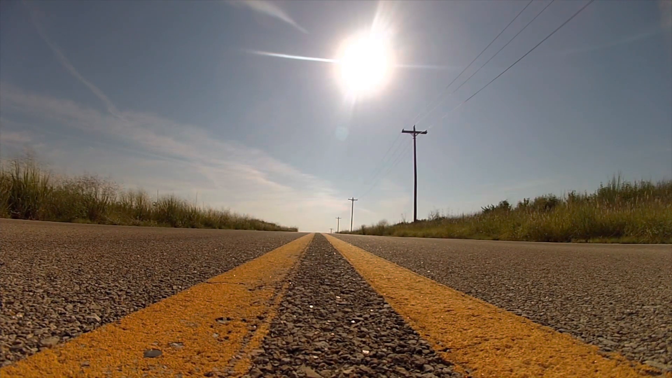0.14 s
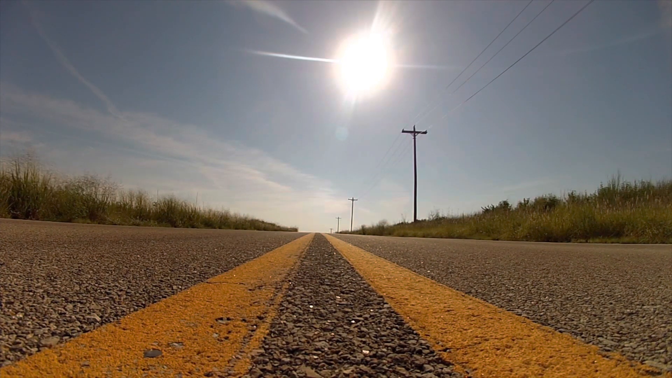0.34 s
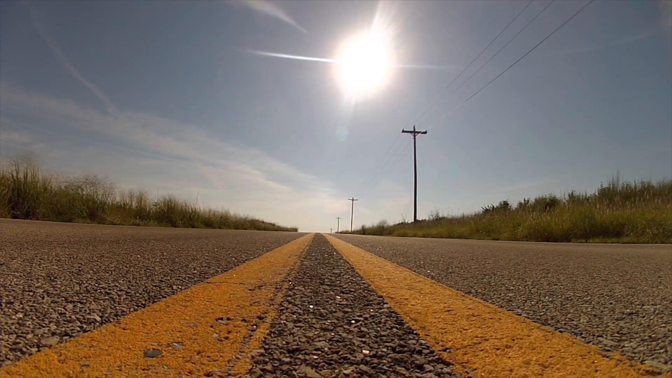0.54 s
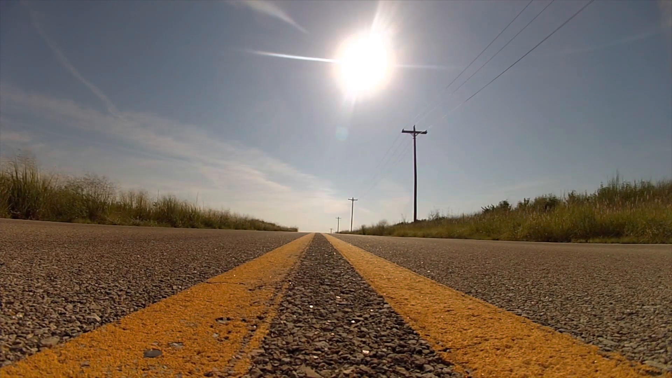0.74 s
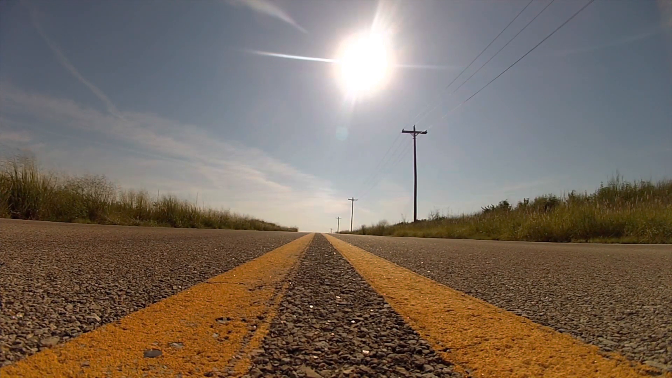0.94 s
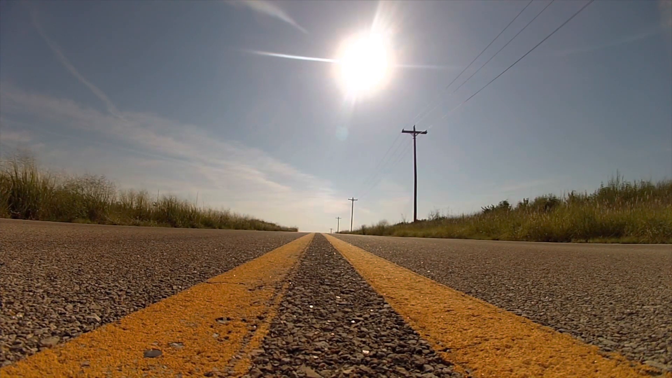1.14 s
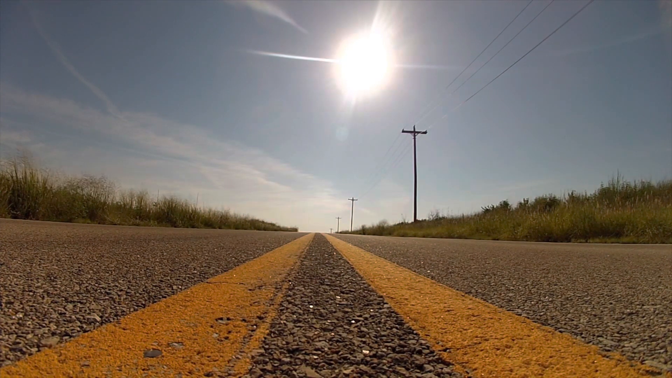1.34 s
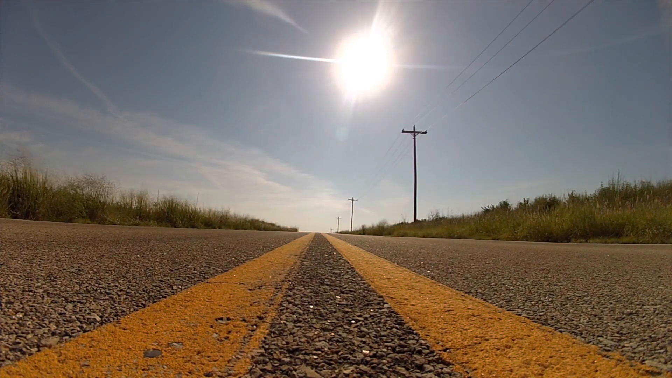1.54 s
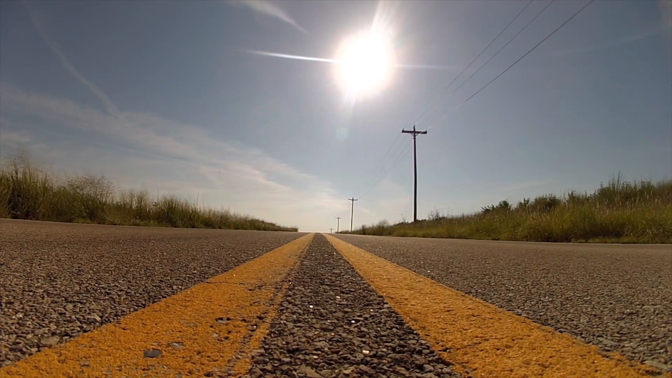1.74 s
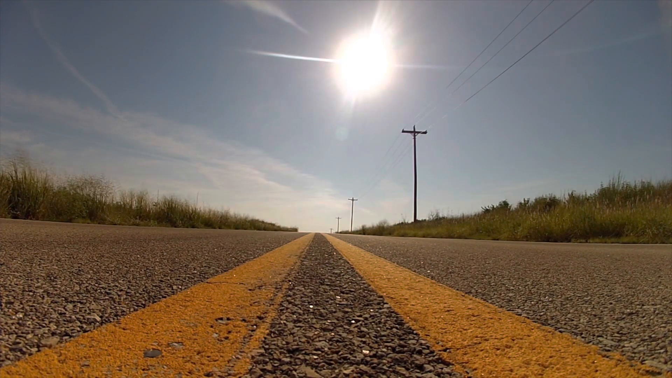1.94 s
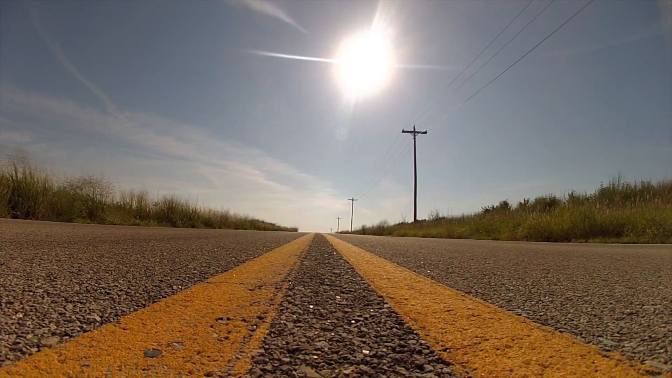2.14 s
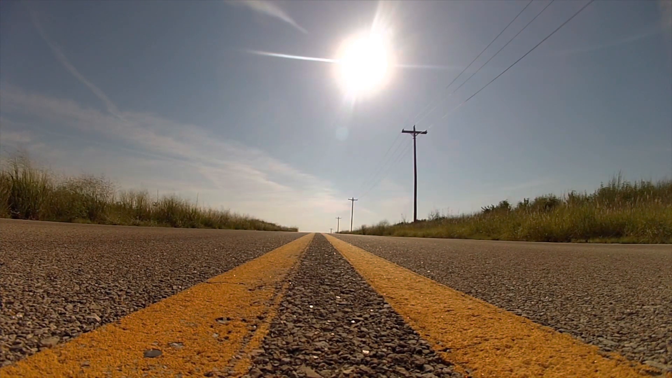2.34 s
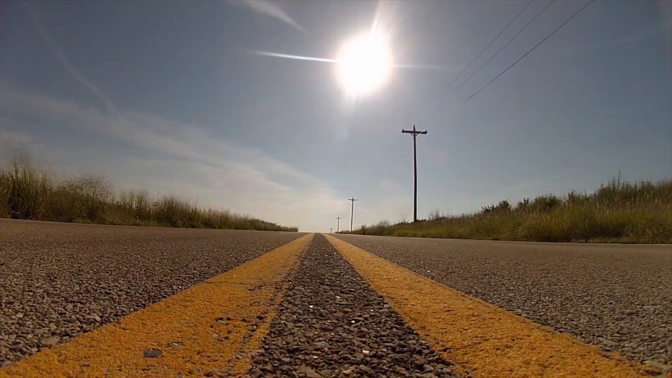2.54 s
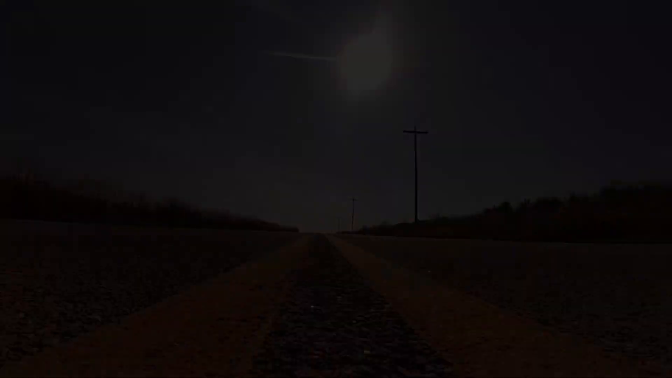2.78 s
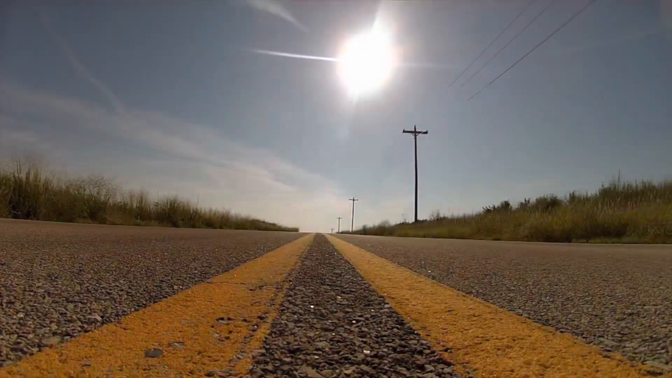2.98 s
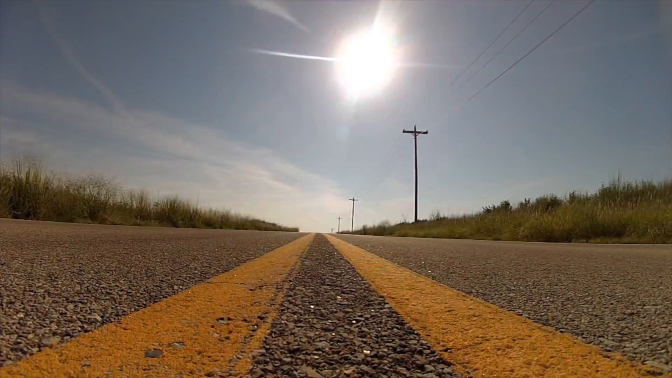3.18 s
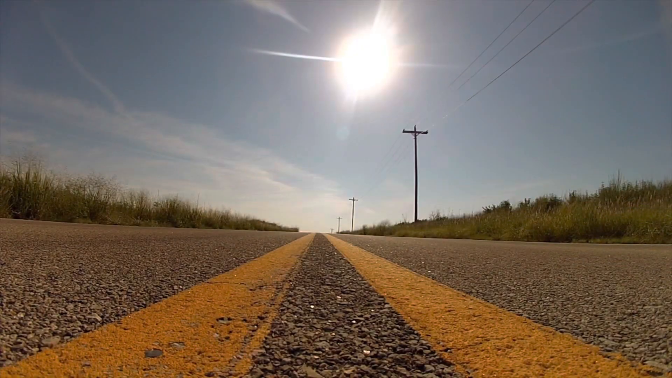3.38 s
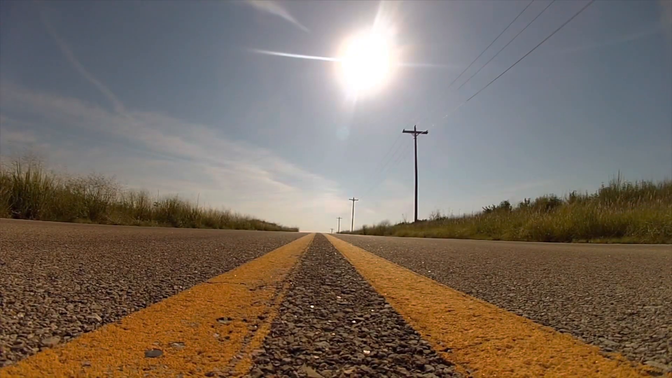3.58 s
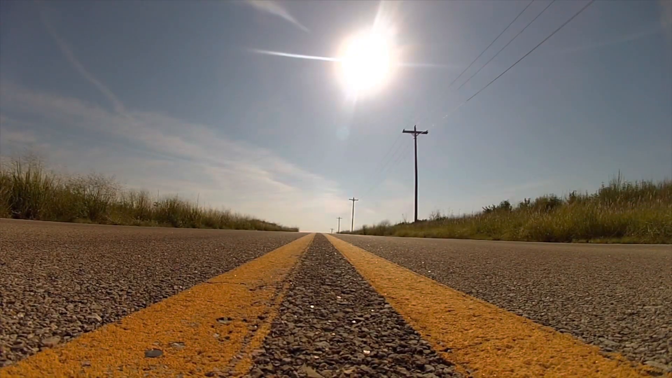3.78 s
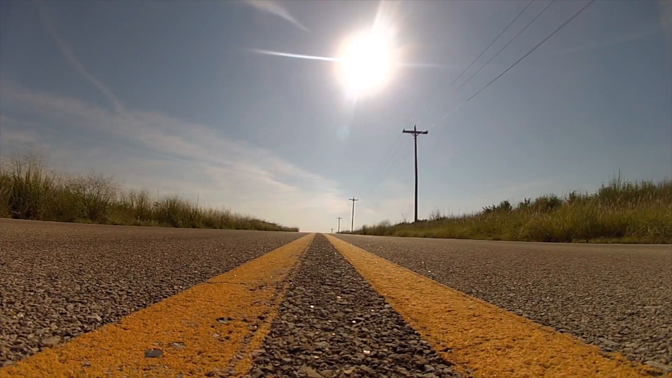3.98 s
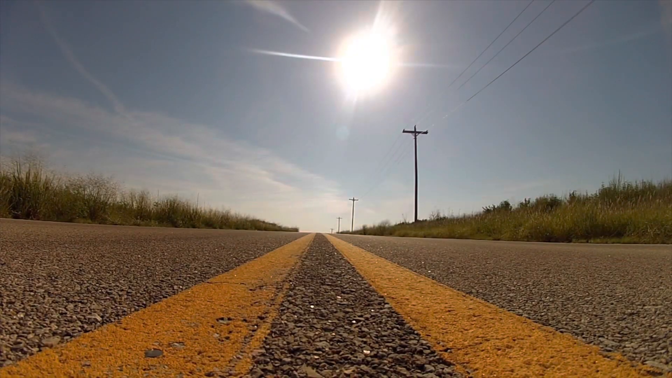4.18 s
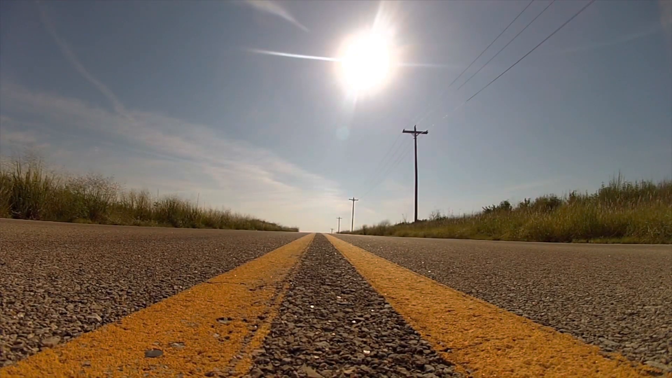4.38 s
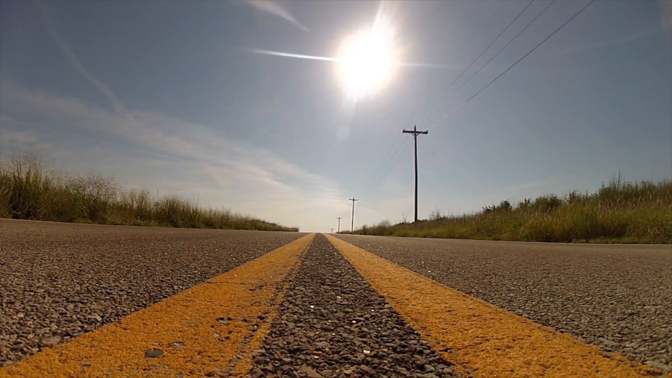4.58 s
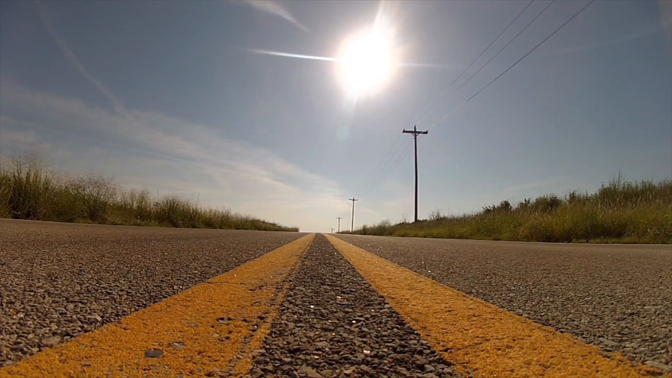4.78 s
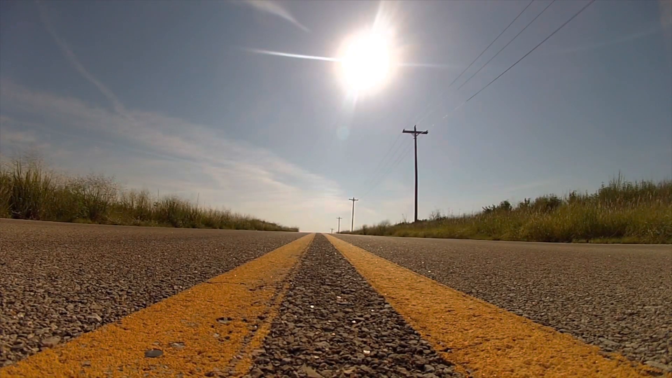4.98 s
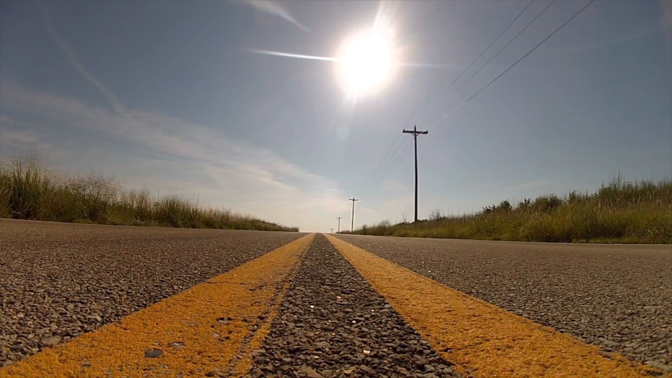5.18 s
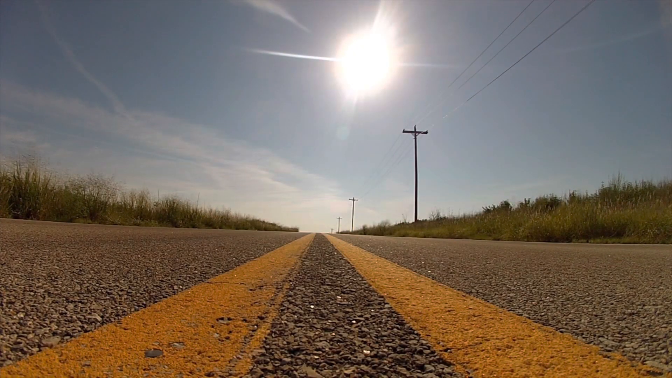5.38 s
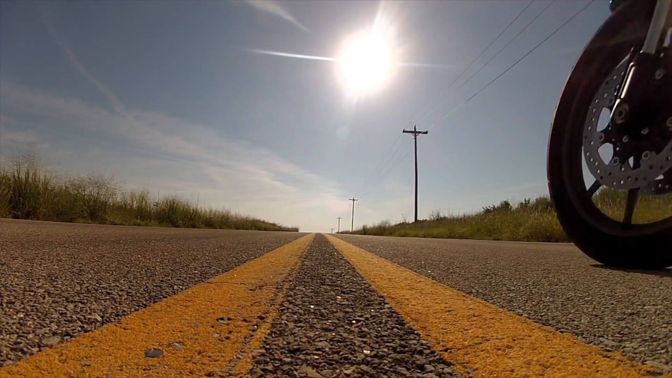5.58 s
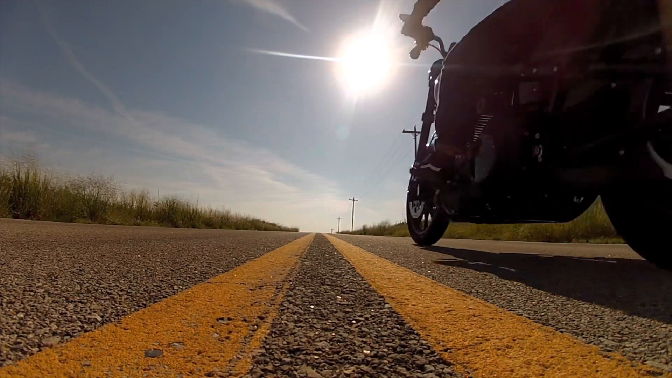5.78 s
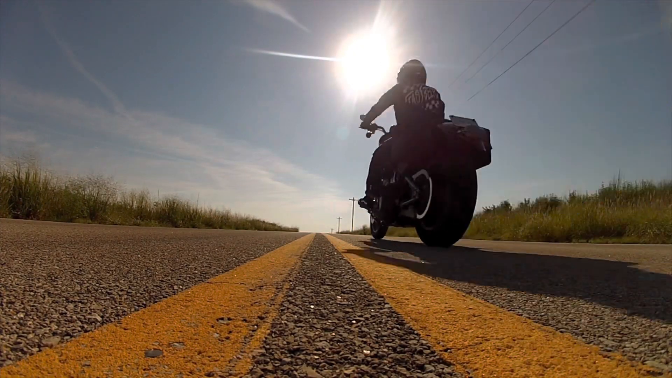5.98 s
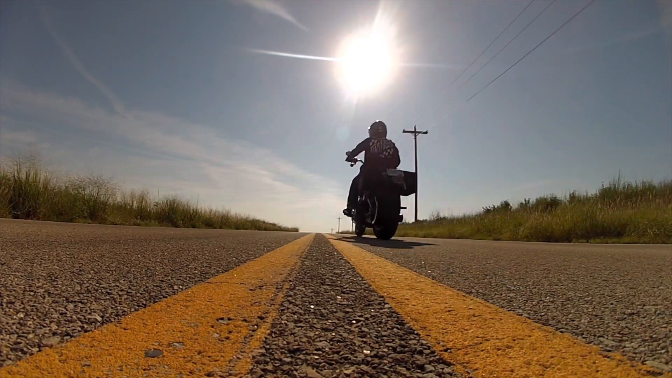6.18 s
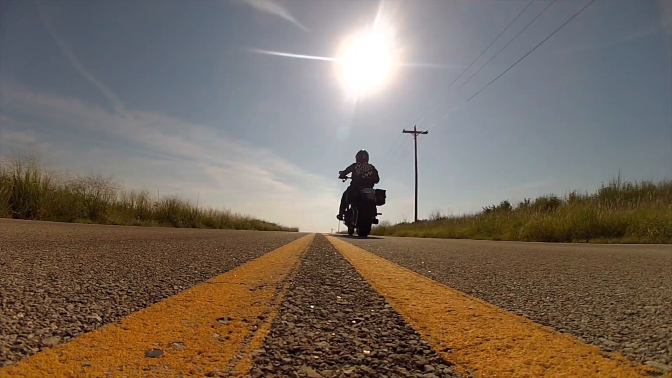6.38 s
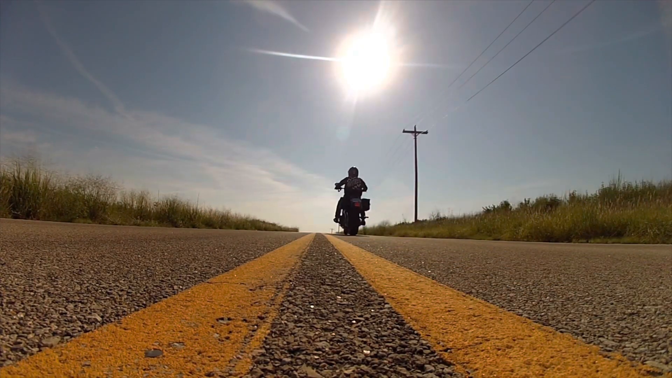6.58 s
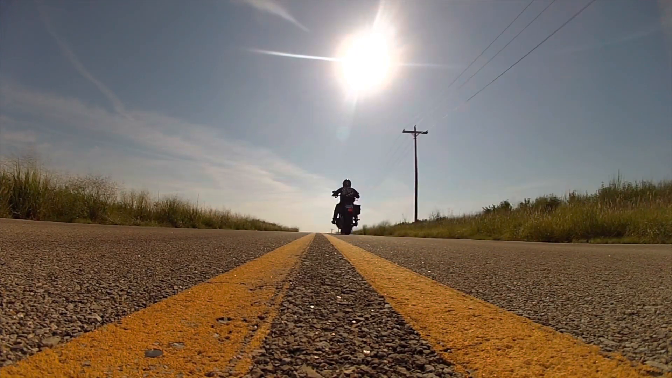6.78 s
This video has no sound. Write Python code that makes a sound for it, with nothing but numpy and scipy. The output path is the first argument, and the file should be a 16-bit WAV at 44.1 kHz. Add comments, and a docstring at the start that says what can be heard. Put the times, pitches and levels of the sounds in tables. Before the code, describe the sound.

A big twin-cylinder motorcycle drones off into the distance, then rolls up from behind, drops to idle, passes close and barks away under throttle blips.

```python
"""A big V-twin motorcycle with open pipes, heard by a microphone lying on a country road.
First it drones away into the distance: sharp exhaust pulses with noisy treble that dies off. After a short fade
it rolls up from behind and drops to idle: tones locked to the crank boom, under clatter and gear whine.
It passes and barks off under blips of throttle: single thumps with jet noise, and a soft throb and burble.
Quiet air noise lies beneath it all, and the loudest barks overload the microphone."""
import sys
import numpy as np
from scipy import signal
from scipy.fft import rfft, irfft, next_fast_len
from scipy.io import wavfile
from scipy.ndimage import uniform_filter1d, map_coordinates

SR = 44100
rng = np.random.default_rng(int(sys.argv[2]) if len(sys.argv) > 2 else 0)


def file_out(sig):
    """Save sig as 16-bit WAV at sys.argv[1]."""
    # one column per channel
    cols = np.atleast_2d(sig).T
    # limit, then scale
    lim = np.clip(cols, -1, 1)
    pcm = np.round(lim * 32767).astype(np.int16)
    wavfile.write(sys.argv[1], SR, pcm)


N = 301203
T = np.arange(N) / SR  # time in s
CUT_S, PASS_S = 2.776, 5.72  # the ride away ends and the approach begins; the engine passes
CRUISE_HZ, IDLE_HZ = 21.7, 9.5  # engine cycles a second

# Colour tables, here and below, give relative levels per Hz over frequency.
# Low rumble of the engine and pipes: (f/Hz, level/dB)
RUMBLE_COLOUR = [(12, -50), (20, -4), (38, -19.5), (75, -7.5), (97, 2), (117, -5.5), (135, -17.5),
                 (177, 5.5), (225, -25.5), (290, -9), (468, -14), (818, -23.5), (900, -30.5), (1170, -42.5),
                 (1980, -120)]
# The snap of a firing: (f/Hz, level/dB)
SNAP_COLOUR = [(210, -8.5), (350, -10), (635, -18.5), (906, -14), (1220, -22), (1680, -23), (2400, -38.5),
               (3120, -65.5), (5280, -120)]
# Clattering engine parts: (f/Hz, level/dB)
CLATTER_COLOUR = [(710, -5), (1200, -8.5), (1460, -14.5), (1690, -6.5), (2110, -11.5), (2370, -19),
                  (2870, -7), (3310, -12), (4340, -10.5), (5290, -14.5), (6880, -28), (8000, -25),
                  (10400, -59.5), (17600, -120)]
# What the engine is doing: (t/s, state: 0 cruising, 1 throttle shut, 2 idling)
ENGINE_STATE = [(3.785, 0), (3.803, 1), (4.3, 1), (4.55, 2)]


def leaving():
    """A slowing engine fires unevenly; the roadside scatters the treble of its pulses into a later rasp."""
    # Fading exhaust: (t/s, level/dB)
    exhaust_levels = [(0.0, -23.5), (0.8, -25.5), (1.76, -30), (2.7, -32.5)]
    speed_hz = 26.745 - 1.1244 * T  # engine cycles a second
    crank = np.cumsum(speed_hz) / SR - .645
    exhaust_db, = curves(exhaust_levels)
    train = firings(crank, gap=.408, second_db=-4.5, scatter_db=.6, jitter_s=.00004)
    far = np.clip(T / CUT_S, 0, 1)
    exhaust = far_exhaust(crank, train, far)
    treble = far_treble(crank, train, far, exhaust_db)
    fade = np.clip((CUT_S - T) / 0.04, 0, 1)
    return fade * (amp(exhaust_db) * exhaust + treble)


def far_exhaust(crank, train, far):
    """Each firing sends a pressure pulse with a bite; its colour changes with distance (far, 0 to 1)."""
    # Pulses from behind the pipes: (f/Hz, level/dB)
    near_pipe = [(15, -57), (30, -17), (60, 5.5), (125, 9), (200, 3), (320, 7), (400, 7), (480, 3),
                 (620, -5), (800, -30), (1050, 0), (1400, -65), (1850, -43), (2400, -54), (2900, -48),
                 (4500, -69), (8000, -110)]
    # The same pulses from further off: (f/Hz, level/dB)
    far_pipe = [(15, -53), (30, -2.5), (60, 11.5), (125, 5), (180, 10.5), (240, 3.5), (320, -0.5),
                (460, -6), (620, 0), (800, -30), (1050, -2), (1400, -68), (1850, -38), (2400, -54),
                (2900, -42), (4500, -62), (8000, -110)]
    # The bite of a far firing: (f/Hz, level/dB)
    bite_colour = [(250, -68), (450, 14.5), (600, 14.5), (750, 13.5), (950, 3.5), (1200, -22.5), (1500, -6),
                   (2000, -21), (2900, -12.5), (4000, -82), (8000, -100)]
    # Firings that bite harder: (t/s, extra level/dB)
    hard_bites = [(.401, 2.5), (.4395, 2.5), (.478, 1), (.5925, 5.5), (.631, 3), (.747, 4), (.786, 4.5),
                  (.98, 2), (1.097, 6.5), (1.215, 2.5), (1.2545, 7), (1.532, 5), (1.773, 4.5), (2.14, 1.5),
                  (2.264, 0), (2.3885, 5), (2.555, 4.5)]
    # Rough road noise under the pulses: (f/Hz, level/dB)
    road_colour = [(15, -57), (25, -17.5), (92, -18), (146, 2), (185, -36), (397, 21), (920, -7),
                   (1490, -39), (1750, -35), (2410, -15), (3000, -5), (3900, -73), (6600, -120)]
    near_pulses = unit(coloured(train, near_pipe, ring=0.19, lean=-0.75))
    far_pulses = unit(coloured(train, far_pipe, ring=0.19, lean=-0.75))
    pulses = (1 - far) * near_pulses + far * far_pulses
    # Each firing bites with its own strength.
    bite = firings(crank - .008, gap=.408, second_db=-15, scatter_db=1.3, jitter_s=.00006)
    bite = bite * amp(sum(db * bump(s, .006) for s, db in hard_bites))
    bite = unit(coloured(bite, bite_colour, ring=0.23, lean=0.77))
    road = amp(-21) * noise(road_colour)
    return pulses + amp(-6.5 + 0.78 * far) * bite + road


def far_treble(crank, train, far, exhaust_db):
    """Bursts of noise follow the firings as rasp, sizzle, ticks, pipe ring and spit, and fade with distance."""
    # Rows rasp, sizzle, tick, ring, spit: (level at the start/dB, dB lost per dB of exhaust)
    treble_fades = [(-34.5, 1.15), (-55.5, 1.2), (-55.5, 5), (-38, 0.6), (-37.5, 2.5)]
    # Rasp: (f/Hz, level/dB)
    rasp_colour = [(400, -9), (700, 2), (900, -1.5), (1050, -6), (1200, -3.5), (1450, -13), (1700, -6),
                   (1850, -3.5), (2050, -13.5), (2400, -21), (3250, -31.5), (5500, -110)]
    # A band of rasp that dies first: (f/Hz, level/dB)
    early_colour = [(1100, -34), (1300, -3), (1500, 2), (1800, 2), (1950, -15), (2300, -56.5)]
    # Sizzle: (f/Hz, level/dB)
    sizzle_colour = [(2000, -37), (2500, 2.5), (2900, -11.5), (3500, -6), (4500, -8.5), (6000, -26.5),
                     (9000, -50)]
    # Valve ticks: (f/Hz, level/dB)
    tick_colour = [(3500, -18), (4500, -11), (5300, 19), (5900, -21), (6500, -33), (9000, -58)]
    # The tail pipe ringing on after a firing: (f/Hz, level/dB)
    ring_colour = [(600, -28), (850, -2.5), (1000, 4), (1120, -5), (1300, -23.5), (2000, -62.5)]
    # A short rasp between firings: (f/Hz, level/dB)
    spit_colour = [(450, -19), (750, -3.5), (1050, 0.5), (1350, -5), (1750, 3.5), (2000, -1.5), (2300, -17),
                   (2800, -14), (3200, -23), (5500, -51.5)]
    exhaust_change_db = exhaust_db - exhaust_db[0]
    rasp_db, sizzle_db, tick_db, ring_db, spit_db = [
        start_db + loss * exhaust_change_db for start_db, loss in treble_fades]
    # The rasp swells once, and the other layers take a share.
    swell_db = 7.5 * bump(1, 0.17)
    rasp_db, sizzle_db = rasp_db + 1.25 * swell_db, sizzle_db + 0.18 * swell_db
    ring_db, spit_db = ring_db + 0.57 * swell_db, spit_db + 0.96 * swell_db

    late = firings(crank - .63, gap=.05, second_db=-3, scatter_db=2.5, jitter_s=.0007)
    jet_train = 0.55 * np.roll(train, -40) + 0.28 * (1 - far) * late
    jets = unit(puffs(jet_train, rise_s=0.0029, fall_s=0.0024))
    rasp = unit((0.83 * amp(-0.6 * swell_db) + jets) * noise(rasp_colour))
    early = amp(-40.5) * bump(0, 0.25) * unit((1.8 + jets) * noise(early_colour))
    sizzle = unit((0.66 + jets) * amp(2.3 * wobble(25.66)) * noise(sizzle_colour))
    valves = firings(crank - .62, gap=0.31, second_db=-15, scatter_db=5.0, jitter_s=0.0014)
    taps = unit(puffs(valves, rise_s=0.0011, fall_s=0.0046))
    tick = unit((0.27 + taps) * noise(tick_colour))
    knocks = firings(crank - .02, gap=.43, second_db=-1, scatter_db=3.5, jitter_s=.0004)
    ring = unit(puffs(knocks, rise_s=0.0012, fall_s=0.0032) * noise(ring_colour))
    spit = unit(puffs(late, rise_s=0.0012, fall_s=0.0024) * noise(spit_colour))
    return (amp(rasp_db) * rasp + early + amp(sizzle_db) * sizzle + amp(tick_db) * tick
            + amp(ring_db) * ring + amp(spit_db) * spit)


def arriving():
    """Each firing booms in the pipes; the engine's clatter and gears rise as it comes close."""
    # Engine speed: (t/s, cycles a second/Hz)
    speeds = [(2.77, 21.8), (2.9, 21.2), (3.05, 21.22), (3.2, 22.0), (3.33, 21.45), (3.76, 22.22),
              (3.81, 20.75), (3.9, 20.07), (4.35, 12.97), (4.4, 12.4), (4.5, 11.95), (4.56, 11.3),
              (4.65, 10.15), (4.75, 9.61), (5.05, 9.54), (5.24, 9.33), (5.62, 8.97)]
    # Layer levels on the way in: (t/s, boom level/dB, snap level/dB, clatter level/dB)
    layer_levels = [(2.86, -17.5, -40, -52), (3.3, -15, -37, -45.5), (3.78, -15, -34, -40.5),
                    (3.81, -14.5, -29.5, -41), (4.59, -17, -41.5, -39.5), (4.96, -14.5, -34.5, -38.5),
                    (5.6, -14, -31, -36.5), (5.68, -15.5, -31.5, -42.5)]
    # Hiss: (f/Hz, level/dB)
    hiss_colour = [(3530, -17), (6000, -2), (6650, -5), (9020, 2.5), (13200, -4), (14200, -43),
                   (15400, -14.5)]
    # Uneven burning: (f/Hz, level/dB)
    burble_colour = [(120, -35), (220, -5), (300, -2), (450, -9.5), (680, -10), (900, -34.5), (1500, -61)]
    speed_hz, = curves(speeds)
    crank = np.cumsum(speed_hz * (T > CUT_S)) / SR + 1e-9 * T - .32  # the tiny slope keeps it rising
    boom_db, snap_db, clatter_db = curves(layer_levels)
    state, = curves(ENGINE_STATE)

    train = firings(crank + 0.033, gap=.43, second_db=-4.5, scatter_db=3, jitter_s=0.00083)
    jet = puffs(train, rise_s=0.00074, fall_s=0.0057)
    jet /= uniform_filter1d(jet, SR // 4) + 1e-9  # even strength at any engine speed
    rumble = amp(-31 + 4 * state) * noise(RUMBLE_COLOUR)
    popping = np.clip(1 - np.abs(state - 1), .2, 1)  # firings pop most with the throttle shut
    snap = (1 - .55 * popping + .55 * popping * jet) * noise(SNAP_COLOUR)
    clatter = (0.92 + 0.086 * jet) * amp(0.86 * wobble(45)) * noise(CLATTER_COLOUR)
    # Hiss grows faster than the clatter and flares as the engine draws level.
    hiss_db = -58 + 1.6 * (clatter_db - clatter_db.max()) + 10.5 * bump(5.45, 0.1)
    hiss = amp(1.7 * wobble(40)) * noise(hiss_colour)
    slow = (CRUISE_HZ - speed_hz) / (CRUISE_HZ - IDLE_HZ)  # 0 at cruising speed, 1 at idle
    burble_db = -40 + 3 * slow + 2.5 * wobble(35) - 4 * (state == 0)
    burble = amp(burble_db) * noise(burble_colour)
    fade = np.clip((T - CUT_S) / 0.012, 0, 1) ** 2 * np.clip((PASS_S - T) / 0.014, 0, 1)
    return fade * (amp(boom_db) * (boom(crank, speed_hz, state) + rumble) + amp(snap_db) * snap
                   + amp(clatter_db) * clatter + amp(hiss_db) * hiss + gear_whine(crank)
                   + loose_rattle() + burble)


def boom(crank, speed_hz, state):
    """Tones of the cycle: pressure jumps at both firings when shut, and is spread out when cruising or idling."""
    # Tone strengths: (multiple of the cycle, cruising level/dB, idling level/dB), all relative
    orders = [(2, -2, 20), (3, -2, 10), (4, 6, 0), (5, 13, -9), (6, 2, -16), (7, 2, 3), (8, 5, -1),
              (9, -7, -8), (10, -13, 5), (11, 2, -3), (12, 4, 8), (13, 3, -2), (14, 5, -7), (15, -1, -2),
              (16, 0, -3), (17, 2, -9), (18, 4, -12), (19, 0, -16), (20, -6, 2), (21, -1, -5), (22, -3, 4),
              (23, 1, -7), (24, -2, -8), (25, 2, -10), (26, -5, -11), (27, -2, -11), (28, 0, -12),
              (29, 0, -14), (30, -5, -9), (31, 3, -13), (32, -5, -9), (33, -8, -7), (34, -8, -6),
              (35, 2, -8), (36, -3, -14), (43, -1, -25)]
    # What the pipes pass of each multiple: (f/Hz, level/dB)
    boom_pipe = [(18, -77), (40, -28.5), (65, -23.5), (95, -21), (115, -30.0), (140, -30), (175, -27.5),
                 (210, -37.5), (280, -32), (500, -48)]
    # How the pipes spread a pulse, rows cruising, shut, idling:
    # (spread/rad per multiple squared, firing gap/cycles, lead/cycles, lean/rad)
    lower_shape = [(-.16, .48, .07, 1.12), (0, .428, 0, 0), (-.24, .47, .27, .6)]
    # The same columns and rows for the upper multiples
    upper_shape = [(.288, .41, .892, -1.95), (0, .428, 0, 0), (.42, .475, .868, 2.05)]
    # The first upper multiple when cruising, shut, idling
    upper_from = [9, 9, 13]
    shut = 1 - np.abs(state - 1)
    idling = np.clip(state - 1, 0, 1)
    slow = np.clip((CRUISE_HZ - speed_hz) / (CRUISE_HZ - IDLE_HZ), 0, 1)
    loose = .03 + .07 * np.clip(state, 0, 1) + .05 * idling  # how unsteady the tones are
    pipe_hz, pipe_db = np.transpose(boom_pipe)
    wave, power = np.zeros(N), np.zeros(N)
    for order, cruise_db, idle_db in orders:
        is_lower = order < np.array(upper_from)
        spread, gap, lead, lean = np.where(is_lower, np.transpose(lower_shape), np.transpose(upper_shape))
        pair = (1 + np.exp(-2j * np.pi * order * gap)) / 2  # two firings help or cancel each other
        passed_db = np.interp(np.log(order * speed_hz), np.log(pipe_hz), pipe_db)
        size = amp(cruise_db + slow * (idle_db - cruise_db) + passed_db)
        # With the throttle shut, upper tones gain 2.5 dB but the bare firings partly cancel some.
        size *= (amp(2.5) * np.abs(pair[1]) ** 0.21) ** (shut * (order > 5))
        size *= amp(4 * loose * wobble(7))
        shape = np.unwrap(np.angle(pair) + spread * order ** 2 + 2 * np.pi * lead * order + lean)
        drift = loose * np.sqrt(order / 8) * wobble(6)
        phase = 2 * np.pi * order * crank + np.interp(state, range(3), shape) + drift
        wave += size * np.sin(phase)
        power += size ** 2 / 2
    wave /= np.sqrt(power)
    swing = np.sqrt(np.abs(uniform_filter1d(wave ** 2, SR // 60)) + .05)
    return wave / swing ** (.6 * idling)  # partly evens out the swing at idle


def gear_whine(crank):
    """Meshing gear teeth sing at a rate tied to the crank, broken up and louder as they near."""
    # Whine tones: (multiple of the tooth rate, start t/s, end t/s, level before flutter/dB)
    tones = [(1, 4.36, 5.68, -47), (2, 4.15, 4.75, -52)]
    mesh = 2 * np.pi * crank * 171 + .55 * wobble(110)  # 171 teeth a cycle
    whine = np.zeros(N)
    for multiple, start_s, end_s, db in tones:
        fade = np.clip(np.minimum(T - start_s, end_s - T) / 0.058, 0, 1)
        whine += amp(db) * fade * np.sin(multiple * mesh)
    flutter = amp(3 * wobble(45) + 2.5 * (T - 4.5))
    return flutter * whine


def loose_rattle():
    """A loose part rings near 3 kHz in brief shaky swells."""
    # Rings: (t/s, width/s, f/Hz, level before jolts/dB)
    rings = [(4.5, .12, 2830, -53), (4.88, .015, 3050, -46), (5.0, .06, 2930, -44), (5.1, .03, 2840, -46),
             (5.27, .06, 3030, -48), (5.49, .04, 2950, -42), (5.58, .03, 2990, -41)]
    shake, jolt = .6 * wobble(90), amp(3 * wobble(45))
    tones = [amp(db) * bump(s, width_s) * np.sin(2 * np.pi * hz * T + shake)
             for s, width_s, hz, db in rings]
    return jolt * sum(tones)


def barks():
    """Each hard firing is a thump with a steep front, a burst of jet noise and a faint echo down the pipe."""
    # Single hard firings: (t/s, thump peak/dB, shock edge peak/dB, relative crack level/dB)
    hard_firings = [(5.708, -12, -27, -28), (5.7499, -7, -17, -36), (5.904, -10, -19, -32),
                    (5.942, 7, -18, -28.5), (5.9685, -6, -16, -43), (5.9994, -2, -3, -26),
                    (6.0531, -14, -32, -47), (6.116, -11.5, -34, -52.5), (6.128, -7, -21, -42),
                    (6.138, -11, -31, -44), (6.1549, 5, -6.5, -18.5), (6.175, -3.5, -10.5, -26),
                    (6.1987, -3.5, -15.5, -28), (6.2166, -7, -15, -26), (6.2374, -1, -11, -23),
                    (6.2976, -14.5, -27, -39), (6.3564, -13, -26, -40), (6.3853, -16.5, -34, -40),
                    (6.4012, -1.5, -16, -21.5), (6.421, 2, -2.5, -19.5), (6.4359, -1.5, -15.5, -28),
                    (6.454, -0.5, -6, -23), (6.468, -3.5, -14, -30), (6.486, -2, -11.5, -28),
                    (6.4994, -7, -14.5, -34), (6.5222, -8.5, -18, -39), (6.533, -11.5, -37, -50),
                    (6.5528, -3, -21, -38), (6.5652, -9.5, -25, -39), (6.5802, -4.5, 3, -7),
                    (6.645, -10.5, -20.5, -33), (6.6575, -8.5, -19, -32), (6.6759, -5, -10.5, -28),
                    (6.6895, -6, -20, -30), (6.7063, -10.5, -25, -30), (6.7196, -3.5, -8, -30),
                    (6.7662, -10, -20.5, -36.5), (6.7805, -9.5, -17.5, -31), (6.7983, -0.5, -10.5, -24),
                    (6.8121, -7, -16, -26), (6.8299, 6, -7.5, -29)]
    # Thump: (f/Hz, level/dB)
    thump_colour = [(15, -50), (25, -20.5), (90, 5), (150, 4.5), (400, -1.5), (800, -7.5), (1300, -40.5),
                    (2500, -68.5), (5000, -120)]
    # Shock edge: (f/Hz, level/dB)
    edge_colour = [(150, -24.5), (400, -4.5), (800, 5.5), (1400, -5.5), (2500, -13), (5000, -33),
                   (12000, -58)]
    # Crack of the jet: (f/Hz, level/dB)
    crack_colour = [(300, -32), (600, 4), (1000, 5.5), (1400, -7.5), (1850, -2), (2400, -9.5),
                    (3000, -10.5), (4500, -13), (6500, -24), (9000, -31), (14200, -41), (15400, -60.5)]
    # Longer hisses of unburnt gas: (t/s, width/s, level before flutter and road echo/dB)
    gas_hisses = [(5.709, 0.0052, -27.5), (5.751, 0.004, -25.5), (5.902, 0.0029, -29.5),
                  (5.968, 0.0031, -27), (6.573, 0.0017, -37), (6.668, .004, -35.5), (6.699, .004, -29)]
    # Round low thumps, alone or fattening a hard firing: (t/s, peak/dB)
    round_thumps = [(5.7075, -6), (5.749, -8), (5.793, -7), (5.805, -9), (5.883, -14), (5.9027, -2.5),
                    (5.955, -15), (6.014, -12.5), (6.0639, -11), (6.075, -16.5), (6.086, -15.5),
                    (6.106, -10.5), (6.26, -19.5), (6.32, -10.5), (6.373, -15.5), (6.393, -5.5),
                    (6.612, -18), (6.626, -12.5), (6.775, -8)]
    # Round low thumps: (f/Hz, level/dB)
    round_colour = [(15, -49), (40, 0.5), (100, 3.5), (200, -1.5), (350, -11), (600, -30), (1200, -71.5)]
    s, thump_db, edge_db, crack_db = np.transpose(hard_firings)
    thump = peaked(impulses(s - .0004, amp(thump_db)), thump_colour, ring=0.41, lean=-1.09)
    edge = peaked(impulses(s - .0006, amp(edge_db)), edge_colour, ring=0.12, lean=-2.3)
    echo = amp(-25.5) * np.roll(thump, round(.0115 * SR))

    lead = impulses(s - .0022, amp(crack_db))
    jet = puffs(lead, rise_s=0.00072, fall_s=0.0023)
    jet += amp(-30.0) * puffs(lead, rise_s=0.0012, fall_s=0.013)  # a weak longer tail
    crack = amp(8.0) * jet * noise(crack_colour)
    hisses = sum(amp(db) * bump(at, width_s) for at, width_s, db in gas_hisses)
    crack += hisses * amp(3 * wobble(400)) * noise(crack_colour)
    crack = crack + amp(-5.5) * np.roll(crack, round(0.0011 * SR))  # the road mirrors each crack

    round_s, round_db = np.transpose(round_thumps)
    low_thumps = peaked(impulses(round_s, amp(round_db)), round_colour, ring=.1, lean=-0.51)
    return thump + edge + echo + crack + low_thumps


def coasting():
    """With the throttle shut the pipes throb and burble softly; their note climbs as the revs pick up."""
    # The pipe note between barks: (t/s, level/dB)
    throb_levels = [(5.7, -16), (5.9, -20), (6.02, -27), (6.12, -24.5), (6.27, -29), (6.35, -20.5),
                    (6.5, -32.5), (6.6, -28), (6.66, -29.5), (6.73, -26), (6.8, -23)]
    # Rows burble, clatter: (settled level/dB, extra level on passing/dB, its fade/s)
    passing_levels = [(-37.5, 13, 0.047), (-53.5, 8, 0.027)]
    throb_db, = curves(throb_levels)
    burble_db, clatter_db = [db + extra_db * np.exp(-np.abs(T - PASS_S) / fade_s)
                             for db, extra_db, fade_s in passing_levels]
    throb_hz = 92.54 + 59.4 * np.clip((T - 6.1) / .4, 0, 1)
    beat = 2 * np.pi * np.cumsum(throb_hz) / SR + .9 * wobble(35)
    throb = unit(amp(2 * wobble(40)) * (np.cos(beat) + .3 * np.cos(2 * beat)))
    throb = throb + .28 * noise(RUMBLE_COLOUR)
    burble = amp(2.5 * wobble(70)) * noise(SNAP_COLOUR)
    clatter = amp(2.4 * wobble(60)) * noise(CLATTER_COLOUR)
    fade = np.clip((T - PASS_S + 0.04) / 0.015, 0, 1)
    return fade * (amp(throb_db) * throb + amp(burble_db) * burble + amp(clatter_db) * clatter)


def open_air():
    """Steady noise of the open air, strongest in the bass."""
    # Air: (f/Hz, level/dB)
    air_colour = [(20, -7), (200, 3), (3000, -36.5), (8000, -40), (14500, -45.5), (15500, -48)]
    return amp(-46.5) * noise(air_colour)


def firings(crank, gap, second_db, scatter_db, jitter_s):
    """One impulse from each cylinder per cycle, the second a fraction gap of the cycle later."""
    turn = np.arange(np.ceil(crank[0]), crank[-1] - 1)
    s = np.interp(turn[:, None] + [0, gap], crank, T)
    s = s + jitter_s * rng.standard_normal((len(turn), 2))
    size = amp([0, second_db] + scatter_db * rng.standard_normal(s.shape))
    return impulses(s.ravel(), size.ravel())


def puffs(train, rise_s, fall_s):
    """The envelope of the gas jet that follows each impulse."""
    t = T[:SR // 8]
    return signal.fftconvolve(train, np.exp(-t / fall_s) * (1 - np.exp(-t / rise_s)))[:N]


def peaked(train, spectrum, ring, lean):
    """Pulses of one colour; each alone peaks at its impulse size."""
    one = coloured(impulses(np.array([1.]), [1.]), spectrum, ring, lean)
    return coloured(train, spectrum, ring, lean) / np.abs(one).max()


def impulses(s, size):
    """Single-sample clicks at times s."""
    return np.bincount(np.clip(np.round(s * SR).astype(int), 0, N - 1), size, N)


def coloured(x, spectrum, ring=0, lean=0):
    """x through a spectrum; ring 1 puts all ringing after the pulse, lean/rad tips it into a dip and a peak."""
    m = 2 * next_fast_len(N // 2 + 8192)
    f, db = np.transpose(spectrum)
    bins_hz = np.fft.rfftfreq(m, 1 / SR)
    gain_db = np.interp(np.log(bins_hz + 1), np.log(f + 1), db)
    log_gain = np.log(amp(gain_db) + 1e-6)
    cepstrum = irfft(log_gain, m)
    cepstrum[m // 2:] = 0  # one half gives the phase that delays ringing until after the pulse
    phase = 2 * rfft(cepstrum).imag
    return irfft(rfft(x, m) * np.exp(log_gain + 1j * (ring * phase + lean)), m)[:N]


def noise(spectrum):
    """Random hiss of one colour, at unit strength."""
    return unit(coloured(rng.standard_normal(N), spectrum))


def wobble(rate):
    """A smooth random curve, rate knots a second."""
    return map_coordinates(rng.standard_normal(int(N * rate / SR) + 4), [T * rate])


def bump(s, width_s):
    """A bell of height 1 around s."""
    return np.exp(-.5 * ((T - s) / width_s) ** 2)


def curves(rows):
    """One value per sample for each column after the time."""
    s, *cols = np.transpose(rows)
    return [np.interp(T, s, c) for c in cols]


def amp(db):
    """Decibels to a plain factor."""
    return 10 ** (np.asarray(db) / 20)


def unit(x):
    """x scaled to an average (RMS) strength of 1."""
    return x / np.sqrt(np.mean(x ** 2) + 1e-20)


def scene():
    """The ride away, the approach, the barks and the coasting, over open air."""
    return (leaving() + arriving() + barks() + coasting() + open_air())[None]


def record(dry):
    """The microphone overloads at full scale and keeps nothing from 15600 Hz up."""
    clipped = dry / (1 + np.abs(dry) ** 12) ** (1 / 12)
    m = 2 * next_fast_len(N // 2 + 4096)
    kept = np.fft.rfftfreq(m, 1 / SR) < 15600
    return irfft(rfft(clipped, m) * kept, m)[..., :N]


dry = scene()
out = record(dry)
file_out(out)
```